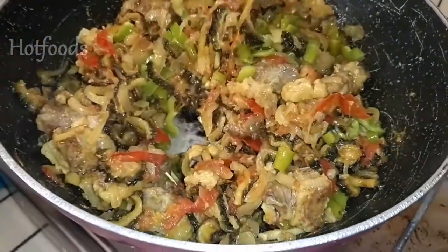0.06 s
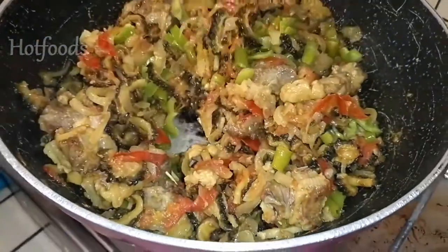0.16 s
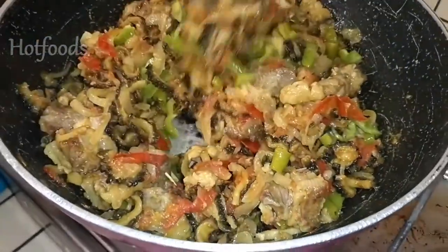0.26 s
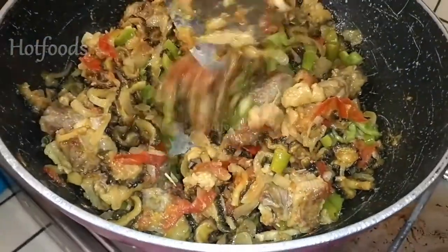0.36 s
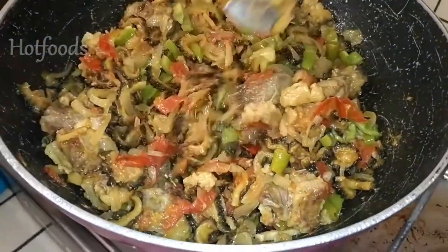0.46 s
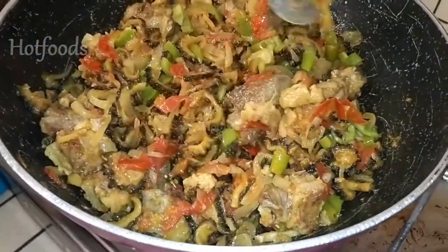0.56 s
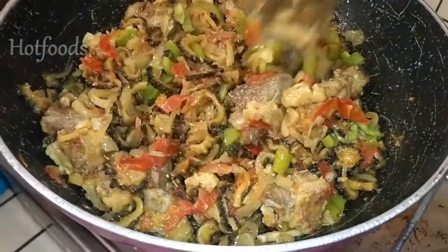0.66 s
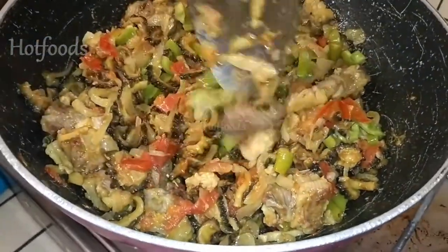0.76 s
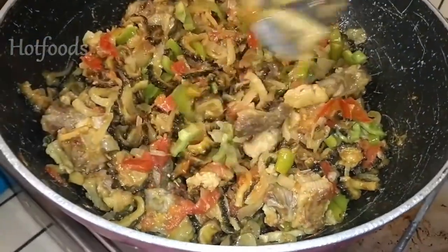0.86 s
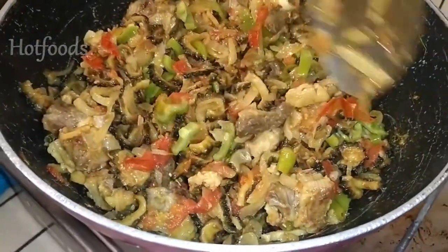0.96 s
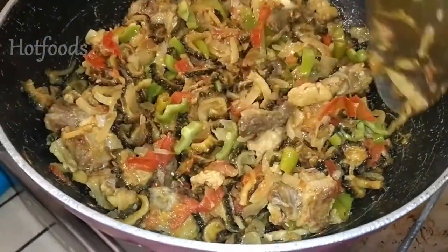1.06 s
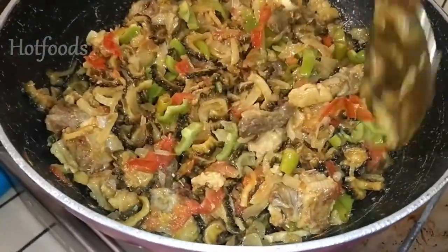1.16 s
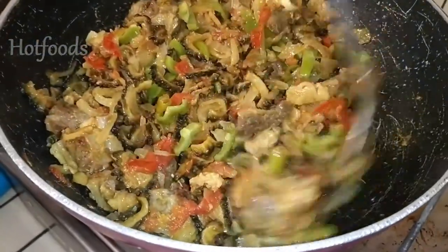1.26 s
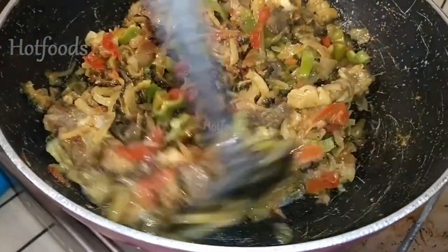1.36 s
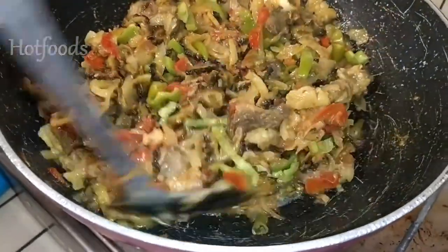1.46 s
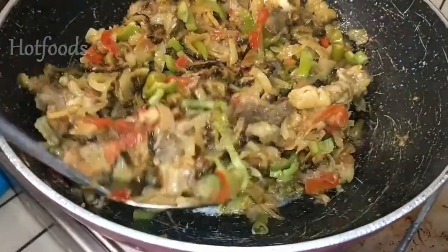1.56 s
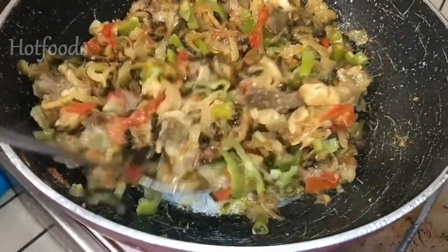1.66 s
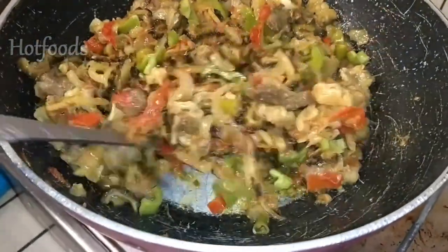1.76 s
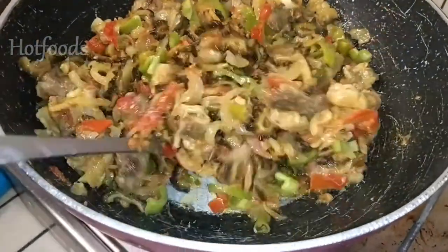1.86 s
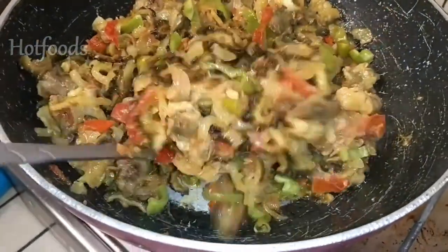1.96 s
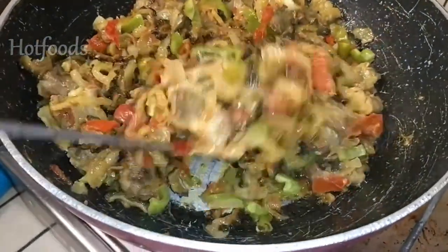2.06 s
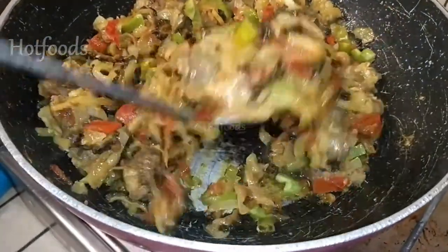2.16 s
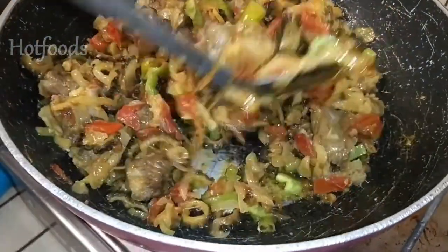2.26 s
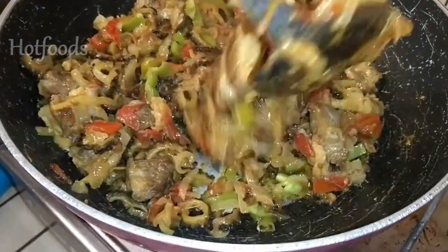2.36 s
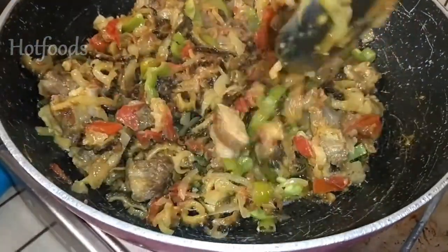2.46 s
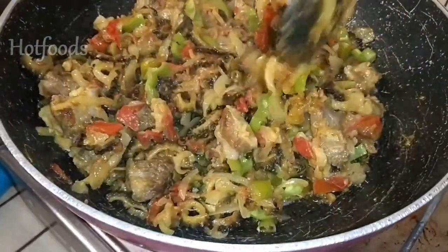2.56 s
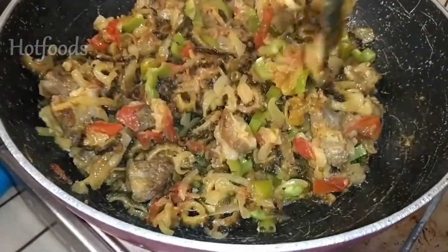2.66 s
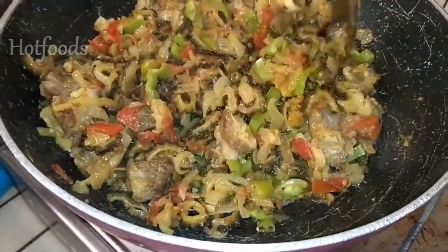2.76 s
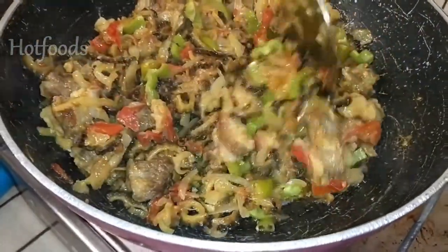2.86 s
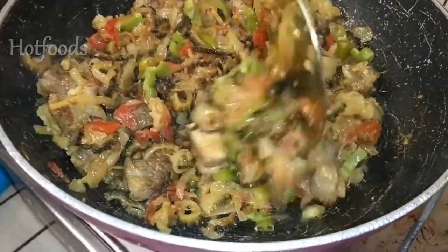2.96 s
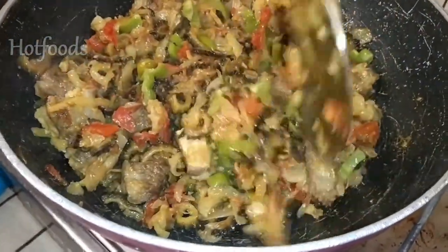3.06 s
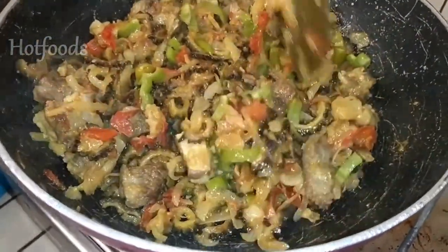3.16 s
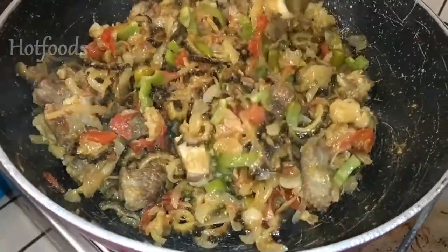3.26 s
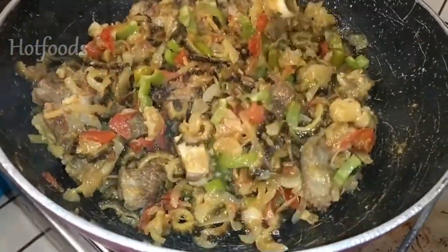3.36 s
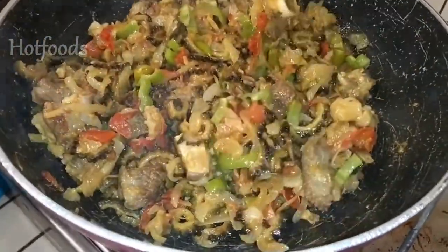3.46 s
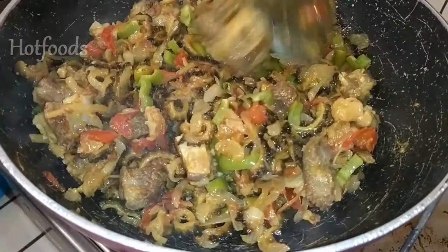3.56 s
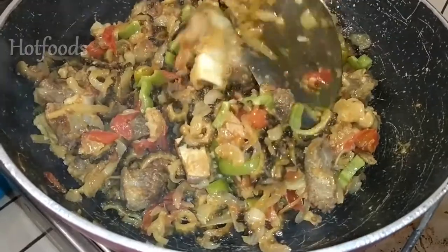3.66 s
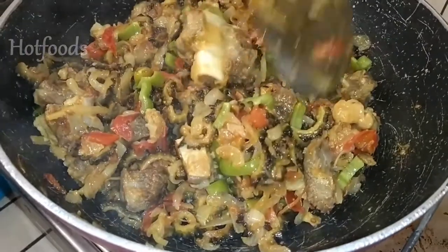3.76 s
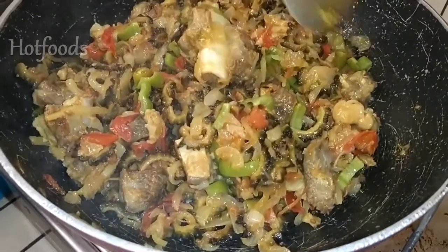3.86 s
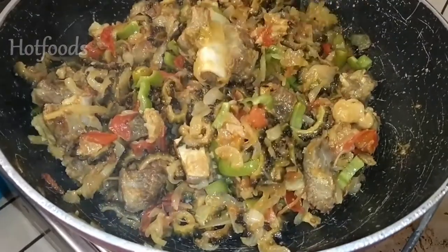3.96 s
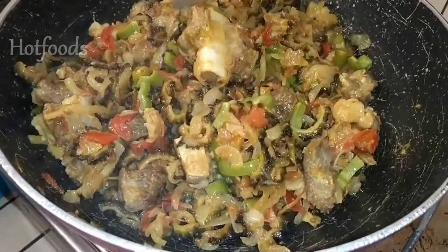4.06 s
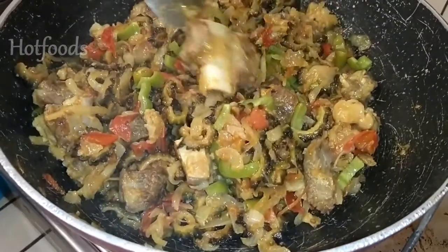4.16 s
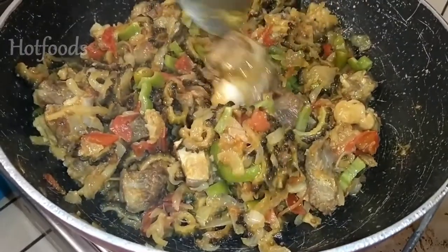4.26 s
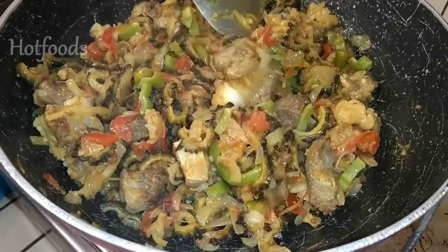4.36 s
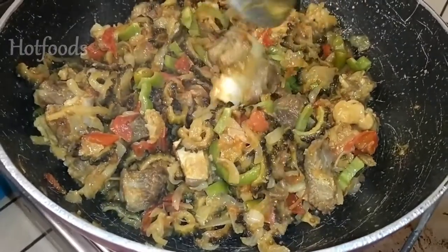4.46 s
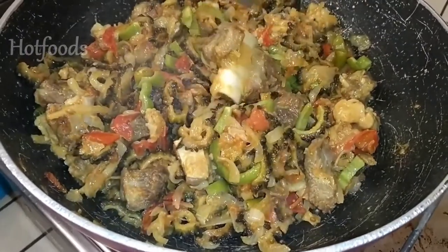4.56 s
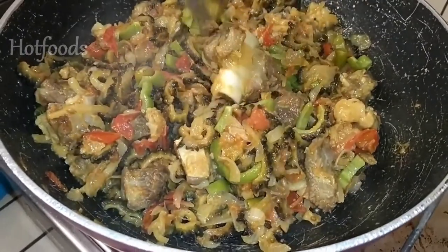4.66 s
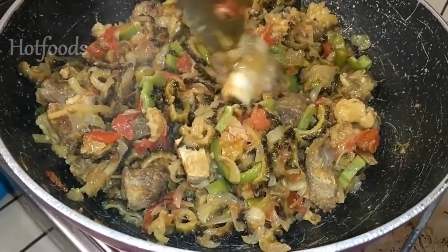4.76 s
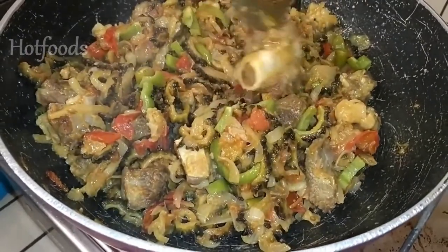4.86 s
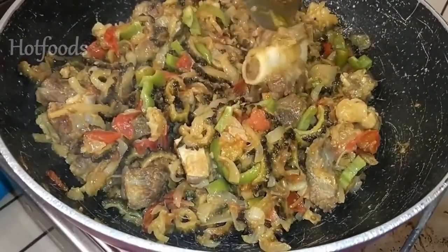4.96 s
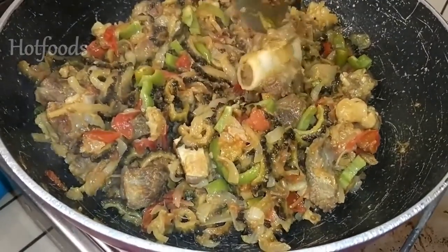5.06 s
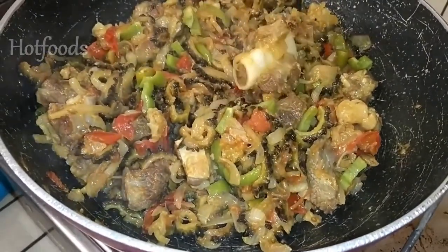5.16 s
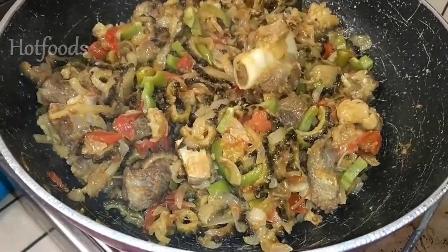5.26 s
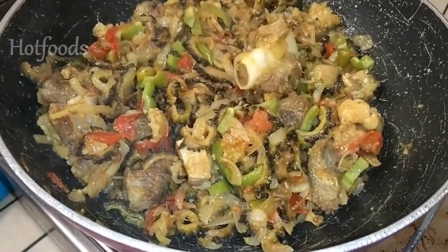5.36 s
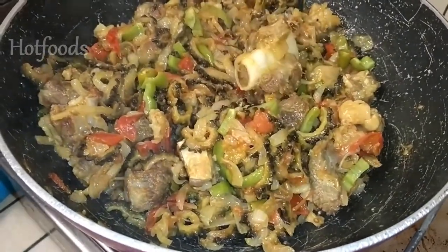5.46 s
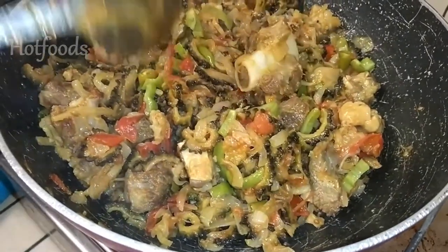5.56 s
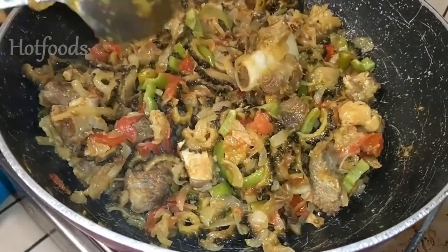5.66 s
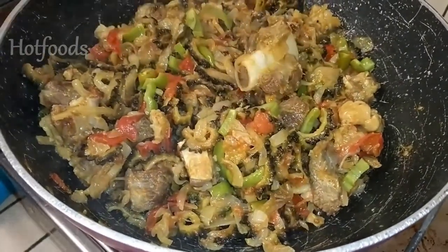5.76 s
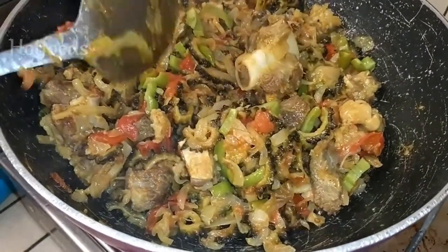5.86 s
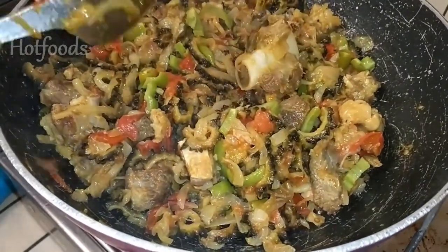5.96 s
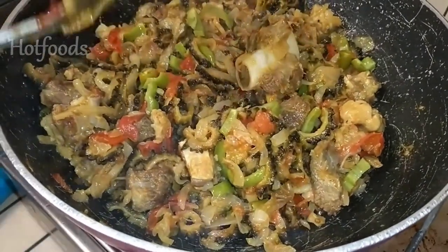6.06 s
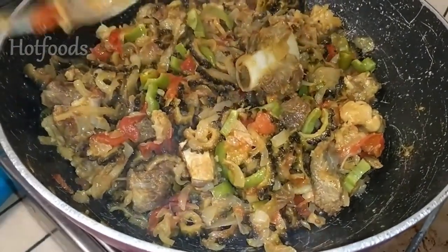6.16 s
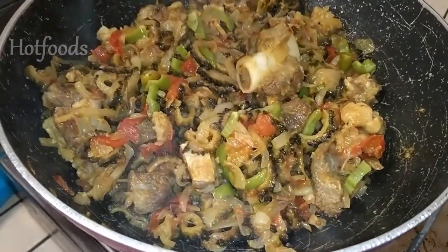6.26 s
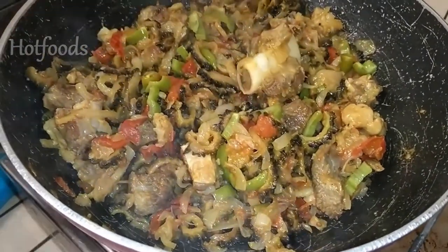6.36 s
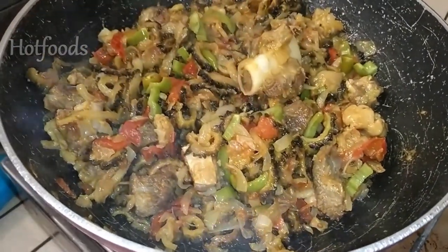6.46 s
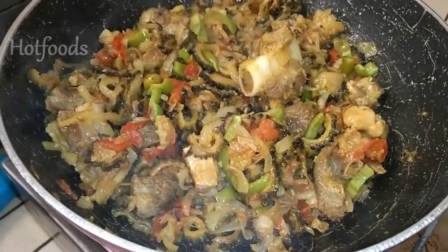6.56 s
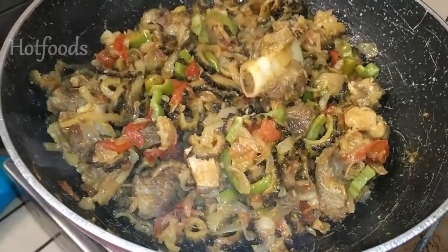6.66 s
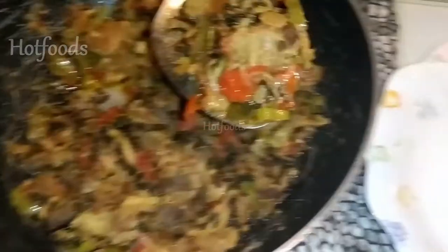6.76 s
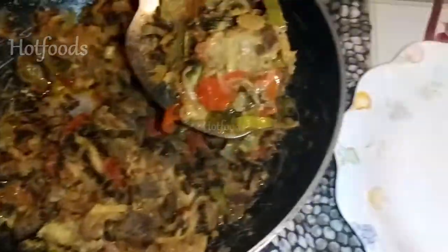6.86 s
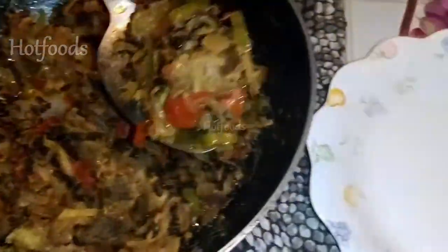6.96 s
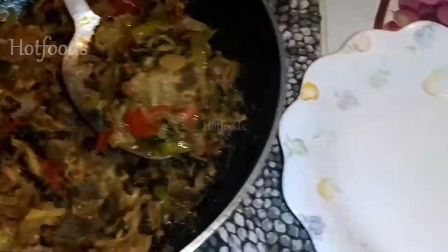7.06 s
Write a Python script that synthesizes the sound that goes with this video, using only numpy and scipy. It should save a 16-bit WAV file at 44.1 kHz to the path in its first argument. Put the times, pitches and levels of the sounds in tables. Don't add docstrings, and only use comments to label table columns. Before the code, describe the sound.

A wok of food fries close to the microphone in a reverberant kitchen, with crisp wide sizzling, tiny pops and sharper fat spits, especially a strong one near 0.9 s. A low gas flame rumble and faint fan drone lie beneath. The sizzle starts flared, settles, swells slightly around 1.45 and 3.9 s, and gradually weakens. At 1.28 s a steel spoon knocks hard, then rasps the coating in uneven scrapes until about 2 s, loudest near 1.42, with fuller taps around 1.56, 1.74 and 1.85. At 3.65 s a bright, loud steel clank hits, rattles for a few hundredths of a second and rings, a high lid tone wavering afterwards. Around 5.37 s a soft, low door thud booms far away. At 6.77 s the frying cuts to a hushed room with faint motor hum, tiny taps near 6.9 and a soft bump at 7.1 s.

```python
import sys
import numpy as np
from scipy import signal
from scipy.fft import rfft, irfft, next_fast_len
from scipy.io import wavfile
from scipy.ndimage import map_coordinates

SR = 44100
rng = np.random.default_rng(int(sys.argv[2]) if len(sys.argv) > 2 else 0)


def output_pcm(signal):
    pcm = np.clip(np.atleast_2d(signal).T, -1, 1) * 32767
    wavfile.write(sys.argv[1], SR, np.round(pcm).astype(np.int16))


def voltage_ratio(level):
    return 10 ** (np.asarray(level, float) / 20)


N = 313992
CUT_S = 6.772

# (frequency [Hz], level [dB])
TABLE_SPECTRUM = [(15, -47), (25, -25), (49, -20), (116, -21.5), (211, -20), (247, -7), (274, -22.5),
                  (365, -28.5), (1530, -38), (3250, -39), (5770, -39), (11700, -45), (12600, -62),
                  (16400, -93), (22000, -120)]
TABLE_DB = -59.5
# (frequency [Hz], level [dB])
MOTOR_HUM = [(242, -83), (1518, -80)]
# (frequency [Hz], time to die by 60 dB [s])
KITCHEN_ECHO = [(200, 0.484), (2000, 0.899), (8000, 0.422), (15000, 0.585)]
# (frequency [Hz], likeness [-1 to 1])
LIKENESS = [(60, 0.75), (150, 0.883), (550, 0.703), (1650, 0.076), (4970, -0.031), (15000, 0.03)]
# (time [s], level [dB], centre [Hz], time to die by 60 dB [s], rise [s])
SOFT_BUMPS = [
    (3.66, -44, 700, 0.27, 0.0053),
    (5.37, -37.5, 145.4, 0.556, 0.0204),
    (5.365, -44.5, 232.4, 0.72, 0.0287),
    (5.374, -51.5, 440, 0.262, 0.0193),
    (5.45, -53.5, 275.7, 3.04, 0.094),
    (6.905, -63, 1127, 0.053, 0.0022),
    (6.925, -69.5, 1100, 0.074, .002),
    (7.099, -57.5, 180, 0.172, 0.012),
]

# (frequency [Hz], level [dB], time to die by 60 dB [s], beats [per s])
LID_RING = (3500, -33, .68, 4.3)
LID_S = 3.679
STEEL_HZ = [2826, 4070, 4608, 5974, 6783, 6993, 7606, 7804, 7958, 8343, 8406, 8499, 9065, 9346, 9679, 9811,
            10290, 11140, 11838, 12300]
# (level [dB], time to die by 60 dB [s])
STEEL_MODES = [(-32.5, 0.14), (-32.5, .3), (-18.5, 0.287), (-22, 0.48), (-24, 0.337), (-26, 0.537),
               (-20.5, 0.96), (-10, 0.43), (-8, 0.45), (-27.5, 0.34), (-22, 0.64), (-10, 0.35),
               (-19.5, .39), (-19.5, .45), (-19, 0.1485), (-19.5, .3), (-26.5, 0.18), (-21, .2),
               (-19, 0.274), (-27, .25)]
# (frequency [Hz], level [dB])
CRASH_SPECTRUM = [(88, -26.5), (150, -9), (712, -20.5), (1250, -25), (1610, -17.5), (2830, -18.5),
                  (3060, -17), (3250, -10.5), (3510, -8.5), (6670, -10), (7790, 0.5), (8930, -6),
                  (10000, -0.5), (11100, -13.5), (15700, -22)]
# (time [s], level [dB])
BLOWS = [
    (3.654, -6),
    (3.6552, -7),
    (3.659, -12),
]
RATTLE_S, RATTLE_GAP_S, RATTLE_DB = 3.664, 0.0045, -10
RATTLE_TOP_S, RATTLE_SPAN_S = 3.68, 0.0226

# (frequency [Hz], width [Hz], level [dB])
WALL_MODES = [(748.4, 68, -2.5), (1147.7, 61.5, 0.5), (1441, 55, -4.5), (1572, 92, -6)]
# (frequency [Hz], width [Hz], level [dB])
BASE_MODES = [(209.7, 42, -3.5), (466, 35.5, 4.5)]
# (frequency [Hz], width [Hz], level [dB])
SPOON_MODES = [(1855, 69, -6), (2074, 103, -6.5), (2747, 147, -4), (3138, 54.4, -2.5), (3705, 147, -6.5)]
# (frequency [Hz], level [dB])
RASP_SPECTRUM = [(1470, -24.5), (2500, -11), (2960, -26), (3510, -2.5), (3700, -7), (4620, -2.5),
                 (6100, -4), (8690, 6), (9310, 0), (15700, -21)]
# (time [s], level [dB], body level [dB], time to die by 60 dB [s], rise [s])
KNOCKS = [
    (1.278, -20, -15, 0.0595, 0.00061),
    (1.5623, -32, -8.5, 0.09, 0.0011),
    (1.739, -32, 0.5, 0.051, 0.0018),
    (1.8474, -36, -19, 0.077, .002),
]
# (fastest moment [s], time to die by 20 dB [s], rasp level [dB], pressure [dB])
STROKES = [
    (1.305, 0.2558, -37.5, -11),
    (1.37, 0.035, -36.5, -12),
    (1.422, 0.075, -29, -12.5),
    (1.575, 0.29, -45.5, -9),
    (1.706, 0.0884, -31, -12),
    (1.785, 0.1518, -34, -7.5),
    (1.83, 0.0667, -34, -4),
    (1.86, 0.0859, -36, -2.5),
]
RISE_SHARE = 0.847
SPOON_DB, SPOON_GROWS, BASE_DB = 1, 1.2, -18.5

# (frequency [Hz], level [dB])
BURNER_SPECTRUM = [(13, -42), (22, -14.5), (91, -1), (120, -3.5), (151, 2), (212, -2.5), (233, -5.5),
                   (339, -2.5), (418, -10), (477, -7), (554, -10.5), (750, -5), (1320, -10.5), (1540, -15),
                   (2000, -9.5), (2600, -46), (4400, -120)]
BURNER_DB = -59
# (frequency [Hz], level [dB])
FRYING_SPECTRUM = [(940, -20), (1600, -10.5), (1900, -14), (2110, -9.5), (2650, -9), (2920, -6),
                   (3340, -8.5), (3640, -6.5), (4890, -8), (6270, -6), (6900, -5), (8040, 0.5),
                   (11600, -13), (12600, -18.5), (15700, -22.5)]
FRY_DB, COOLS_DB_PER_S = -46.5, 0.1433
# (time [s], flare [dB])
STIRS = [
    (0, 3.5),
    (1.45, 1),
    (3.9, 0.72),
]
FLARE_RISE_S, FLARE_FALL_S = 0.1, 0.35
# (time [s], peak level [dB], left minus right [dB])
SPITS = [(0.0314, -44.5, -3), (0.0964, -35.5, -5.5), (0.1714, -40.5, -6.5), (0.2034, -35, 0.5),
         (0.3604, -39, -6.5), (0.4453, -27, 5), (0.6774, -32, -13.5), (0.7804, -28.5, -5.5),
         (0.8899, -22, 0), (0.9724, -28.5, -4), (1.1024, -33, -6), (1.1474, -36.5, -0.5),
         (1.257, -26.5, -1), (1.999, -29, -10), (2.1034, -30, -1), (2.7984, -36.5, -0.5), (3.34, -35.5, -3),
         (3.9544, -31.5, -2.5), (4.0492, -29.5, -5.5), (4.3894, -32, -5.5), (4.4774, -30, 0),
         (4.604, -36, -9.5), (4.9954, -38, -1.5), (5.0404, -35.5, -5), (5.648, -37, -0.5),
         (5.753, -39, -3.5)]

# (frequency [Hz], left minus right [dB])
PORT_LEAN = [(60, 0), (150, -1), (380, -1.5), (950, -0.5), (2380, 3), (5980, -4.0), (15000, -4)]
CEILING, TOP_HZ = 0.9, 15820
# (frequency [Hz], share of short blocks lost)
DROPOUTS = [(2200, 0), (3000, .13), (5300, .15), (6200, .005), (9800, .005), (10800, .11), (15500, .1)]


def unit(x):
    return x / np.sqrt(np.mean(x ** 2) + 1e-20)


def along(points, hz):
    f, v = np.transpose(points)
    return np.interp(np.log(hz + 1), np.log(f + 1), v)


def wobble(rate):
    knots = rng.standard_normal(int(N * rate / SR) + 4)
    return map_coordinates(knots, [np.arange(N) * rate / SR])


def filtered(x, response):
    m = next_fast_len(x.shape[-1] + SR // 2)
    spectrum = rfft(x, m) * response(np.fft.rfftfreq(m, 1 / SR))
    return irfft(spectrum, m)[..., :x.shape[-1]]


def colour(spectrum):
    return lambda hz: voltage_ratio(along(spectrum, hz))


def resonances(peaks):
    def response(f):
        total = 0
        for k, (centre, width, db) in enumerate(peaks):
            damping = 1j * f * width
            total = total + (-1) ** k * voltage_ratio(db) * damping / (centre * centre - f * f + damping)
        return total
    return response


def sides(db):
    return voltage_ratio(np.array([db / 2, -db / 2]))


def grains(spread_db, life):
    sizes = voltage_ratio(spread_db * rng.standard_normal(N)) * (rng.random(N) < 1 / 20)
    bursts = signal.lfilter([1], [1, -np.exp(-1 / (life * SR))], sizes ** 2)
    return unit(np.sqrt(bursts) * rng.standard_normal((2, N)))


def spread(pair, spectrum, alike):
    def mid_side(hz):
        turn = np.arccos(np.clip(along(alike, hz), -1, 1)) / 2
        return voltage_ratio(along(spectrum, hz)) * [np.cos(turn), np.sin(turn)]
    mid, side = filtered(pair, mid_side)
    return unit(np.array([mid + side, mid - side]))


def burst(t60, attack):
    t = np.arange(SR // 2) / SR
    return voltage_ratio(-60 * t / t60) * (1 - np.exp(-t / attack)) * rng.standard_normal((2, len(t)))


def add(track, s, x):
    part = track[:, round(s * SR):][:, :x.shape[1]]
    part += x[:, :part.shape[1]]


def table():
    t = np.arange(N) / SR
    hum = 0
    for hz, db in MOTOR_HUM:
        hum = hum + voltage_ratio(db + 1.5 + 1.1 * wobble(45)) * np.sin(2 * np.pi * hz * t + 0.4 * wobble(45))
    return voltage_ratio(TABLE_DB - 1.5) * spread(rng.standard_normal((2, N)), TABLE_SPECTRUM, LIKENESS) + hum


def kitchen(x):
    hz, t, z = signal.stft(rng.standard_normal((2, SR // 2 + SR // 4)), SR, nperseg=256)
    fading = voltage_ratio(-60 * t / along(KITCHEN_ECHO, hz)[:, None])
    tail = signal.istft(z * fading, SR, nperseg=256)[1]
    late = np.pad(x, ((0, 0), (200, 0)))
    wet = signal.fftconvolve(late, tail / np.linalg.norm(tail[0]), axes=1)
    add(wet, 0, wet[:, N:])
    return wet[:, :N]


def thuds():
    out = np.zeros((2, N))
    for s, db, hz, t60, rise in SOFT_BUMPS:
        bump = burst(t60, rise)
        wide = resonances([(hz, 0.634 * hz, 0)])
        add(out, s, voltage_ratio(db + 19) * filtered(bump[0] + 0.296 * bump, lambda f: wide(f) ** 2))
    return out


def lid():
    hz, db, t60, beats = LID_RING
    out, t = np.zeros((2, N)), np.arange(SR // 2) / SR
    throb = 1 + 0.45 * np.cos(2 * np.pi * beats * t - 0.6)
    shake_db = 2.2 * wobble(70)[:len(t)]
    port_phase = np.array([[0], [1.4]])
    tone = np.sin(2 * np.pi * hz * t + 0.35 * wobble(50)[:len(t)] + port_phase)
    add(out, LID_S, voltage_ratio(db + shake_db - 60 * t / t60) * throb * tone)
    return out


def contacts():
    chance = rng.standard_normal((9, 2))
    s = RATTLE_S + RATTLE_GAP_S * (np.arange(len(chance)) + 0.2 * chance[:, 0])
    db = RATTLE_DB - 15 * ((s - RATTLE_TOP_S) / RATTLE_SPAN_S) ** 2 + 0.596 * chance[:, 1]
    return BLOWS + list(zip(s, db))


def clank():
    out, t = np.zeros((2, N)), np.arange(SR // 2) / SR
    for s, db in contacts():
        chance = rng.standard_normal((len(STEEL_MODES), 2, 2, 1))
        ring = 0
        for hz, (level, t60), c in zip(STEEL_HZ, STEEL_MODES, chance):
            tone = np.sin(2 * np.pi * hz * (1 + 0.0006 * c[1]) * t + 2 * c[1])
            ring = ring + voltage_ratio(level + 1.9 * c[0] - 60 * t / t60) * tone
        crack = filtered(burst(t60=0.0357, attack=0.00015), colour(CRASH_SPECTRUM))
        shimmer = filtered(burst(t60=0.5, attack=0.004), colour(CRASH_SPECTRUM))
        add(out, s, voltage_ratio(db) * (voltage_ratio(-13.5) * ring + voltage_ratio(5) * crack + voltage_ratio(-14.5) * shimmer))
    return out * sides(1.94)[:, None]


def strokes(offset_db, grows):
    s, fall, db, press_db = np.transpose(STROKES)[:, :, None]
    late = np.arange(N) / SR - s
    die_s = fall * np.where(late < 0, RISE_SHARE, 1)
    level_db = db + offset_db + grows * press_db - 20 * np.abs(late) / die_s
    return np.sqrt(np.sum(voltage_ratio(level_db) ** 2, axis=0)) * (late[0] > 0)


def spoon():
    rasp = voltage_ratio(0.5) * spread(grains(spread_db=3.5, life=0.0015), RASP_SPECTRUM, [(1000, 0.2)])
    drag = grains(spread_db=6.5, life=0.0043)
    wall = filtered(0.66 * drag[0] + 0.72 * drag, resonances(WALL_MODES))
    ring = filtered(drag, resonances(SPOON_MODES))
    base = filtered(drag[0] + 0.5 * drag, resonances(BASE_MODES))
    out = strokes(0, grows=0) * rasp
    out += strokes(BASE_DB, grows=0) * unit(base)
    out += strokes(0, grows=1) * unit(wall)
    out += strokes(SPOON_DB, SPOON_GROWS) * unit(ring)
    for s, db, body_db, t60, rise in KNOCKS:
        blow = burst(t60, rise)
        click = filtered(blow, lambda hz: 0.031 + colour(FRYING_SPECTRUM)(hz))
        body = filtered(blow[0] + 0.5 * blow, resonances(BASE_MODES + WALL_MODES))
        add(out, s, voltage_ratio(db + 9) * click)
        add(out, s, voltage_ratio(db + body_db + 14) * body)
    return out


def heat():
    t = np.arange(N) / SR
    flares = 0
    for s, db in STIRS:
        flares = flares + db * np.exp(-np.abs(t - s) / np.where(t < s, FLARE_RISE_S, FLARE_FALL_S))
    return FRY_DB - COOLS_DB_PER_S * t + flares


def stove():
    frying_db = heat()
    fizz_db = frying_db + 3.0 + 0.568 * wobble(4) + 0.69 * wobble(11.0)
    fizz = voltage_ratio(fizz_db) * grains(spread_db=0.0, life=0.0024)
    pop_db = np.minimum(4 * rng.exponential(size=N), 13)
    pops = (rng.random(N) < 200 / SR) * voltage_ratio(pop_db) * rng.choice([-1, 1], N)
    fizz += voltage_ratio(frying_db - 8) * unit(np.array([np.roll(pops, shift=8), pops]))
    for s, db, lean_db in SPITS:
        add(fizz, s, voltage_ratio(db - 10) * sides(lean_db - 4.5)[:, None] * burst(t60=0.021, attack=0.0003))
    norm = np.sqrt(np.mean(colour(FRYING_SPECTRUM)(np.linspace(0, SR / 2, num=2048)) ** 2))
    flame = spread(rng.standard_normal((2, N)), BURNER_SPECTRUM, LIKENESS)
    flame = voltage_ratio(BURNER_DB + 2.5 + 1.86 * wobble(2.839)) * flame
    fan = np.sin(2 * np.pi * 209 * np.arange(N) / SR + 1.2 * wobble(19))
    fan = voltage_ratio(BURNER_DB - 6.5 + 2.9 * wobble(11)) * fan
    return filtered(fizz, colour(FRYING_SPECTRUM)) / norm, flame + fan


def scene():
    (fizz, drone), scraping, clanking = stove(), spoon(), clank()
    echo = kitchen(voltage_ratio(-4.5) * fizz + voltage_ratio(-6.0) * scraping + voltage_ratio(-7.0) * clanking)
    cooking = fizz + drone + scraping + clanking + lid() + echo
    before = np.clip((CUT_S - np.arange(N) / SR) / 0.0036, 0, 1)
    return before * cooking + (1 - before) * table() + thuds()


def gaps(x, odds):
    hz, t, z = signal.stft(x, SR, nperseg=1024)
    power = np.sum(np.abs(z) ** 2, axis=(0, 1))
    steady = power < 2 * np.roll(power, shift=2)
    skipped = rng.random((len(hz) // 3, len(t) // 4 + 1)) < along(odds, hz[::3])[:, None]
    lost = np.kron(skipped, np.ones((3, 4)))[:len(hz), :len(t)]
    kept = 1 - lost * (t < CUT_S) * steady
    return signal.istft(z * kept, SR, nperseg=1024)[1][:, :N]


def roll_off(x):
    return signal.sosfilt(signal.butter(12, 16820, fs=SR, output="sos"), x)


def record(dry):
    ports = filtered(dry, lambda hz: sides(along(PORT_LEAN, hz)))
    softened = ports / (1 + np.abs(ports / CEILING) ** 4) ** (1 / 4)
    mix = gaps(filtered(softened, lambda hz: hz < TOP_HZ), DROPOUTS)
    return roll_off(mix)


dry = scene()
out = record(dry)
output_pcm(out)
```